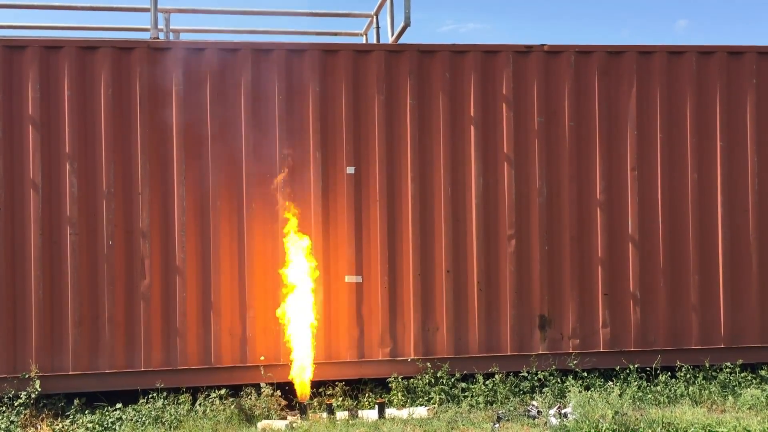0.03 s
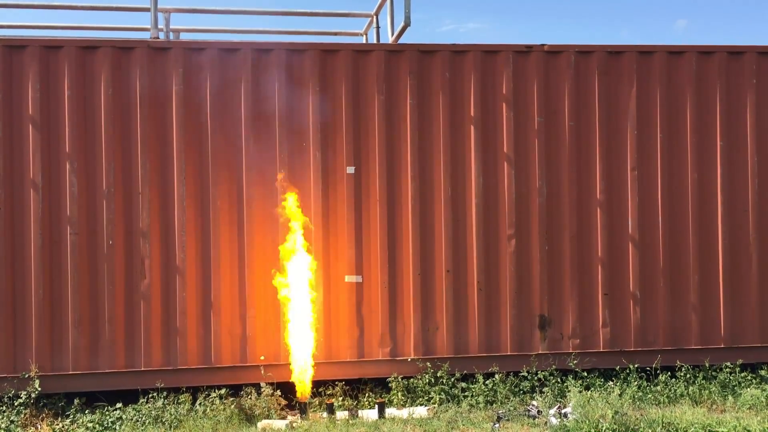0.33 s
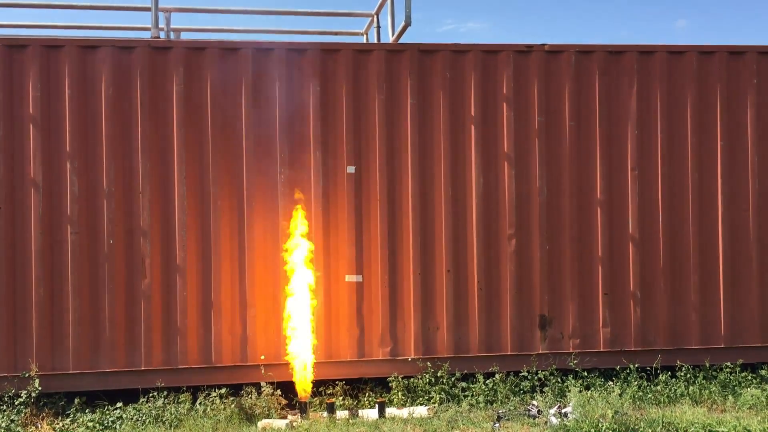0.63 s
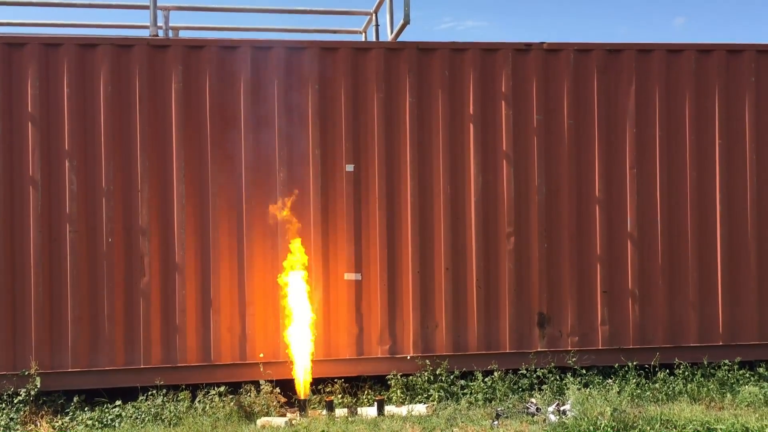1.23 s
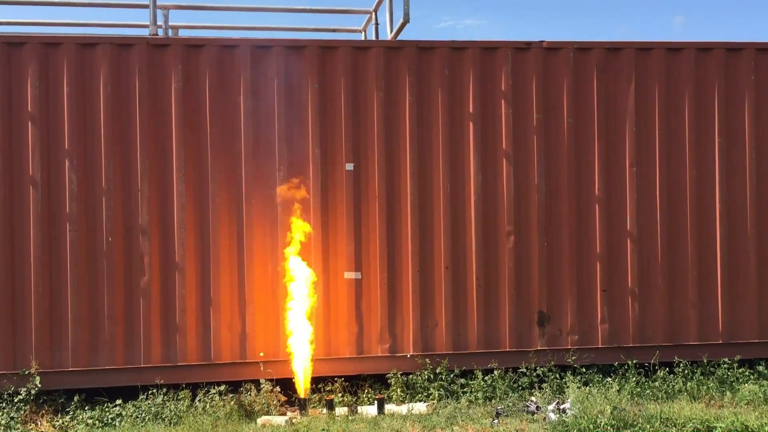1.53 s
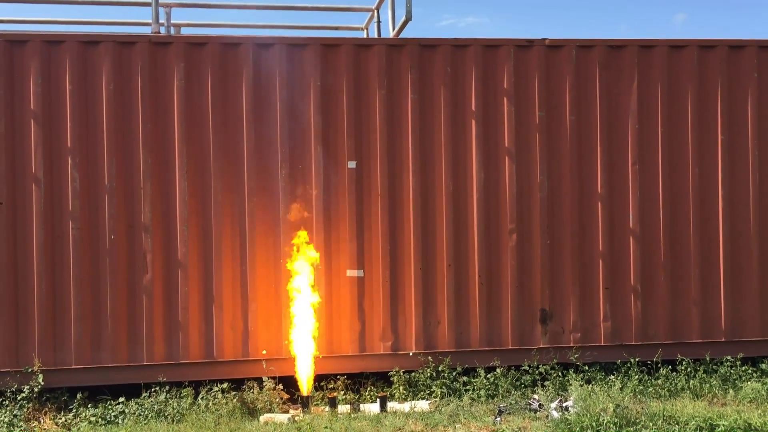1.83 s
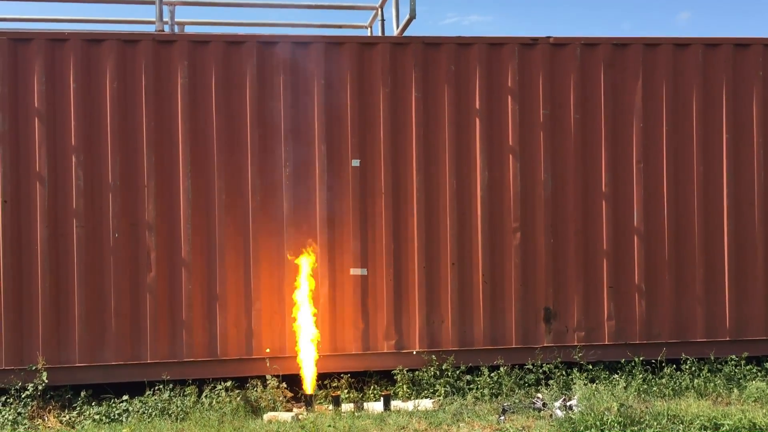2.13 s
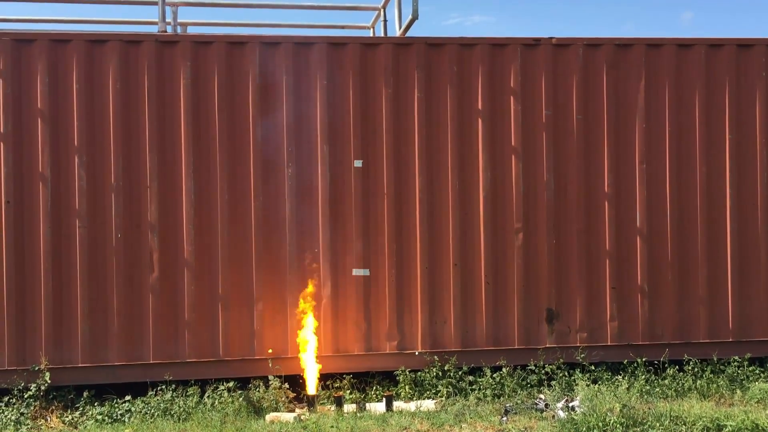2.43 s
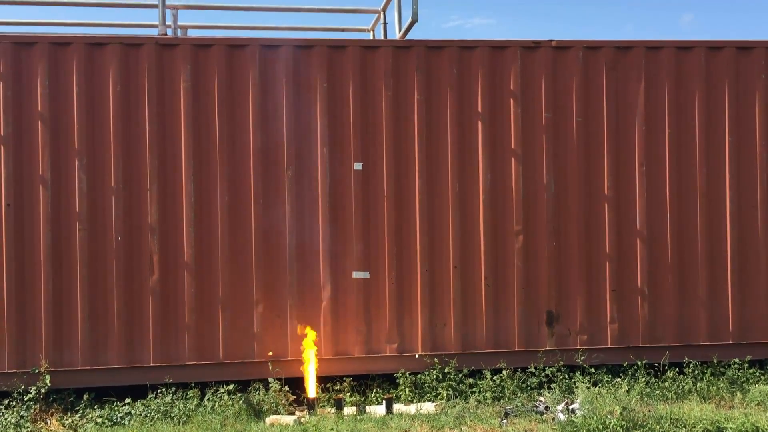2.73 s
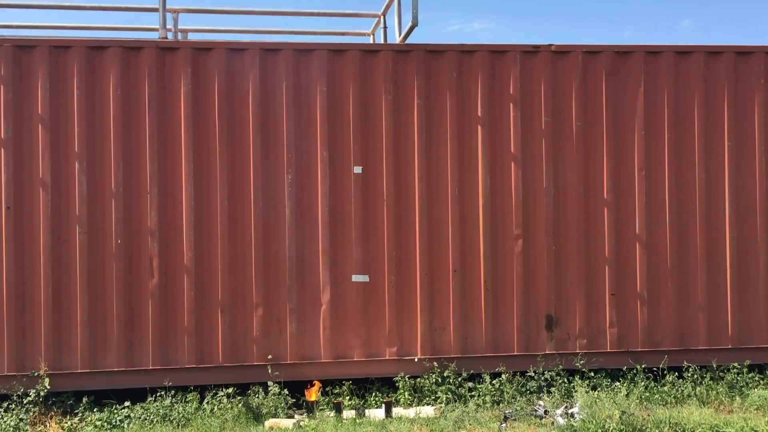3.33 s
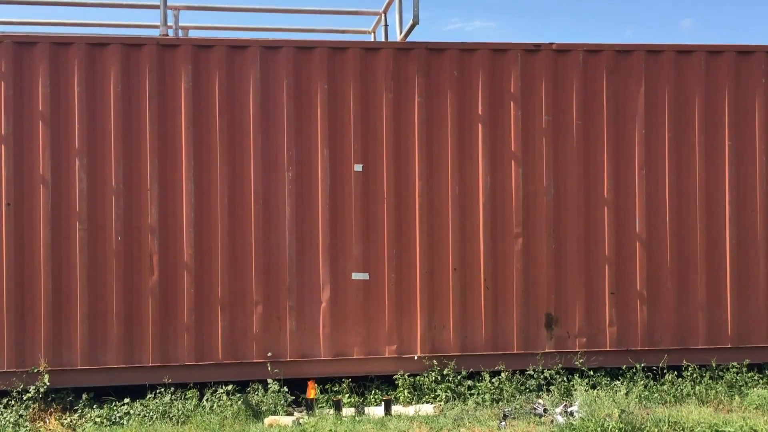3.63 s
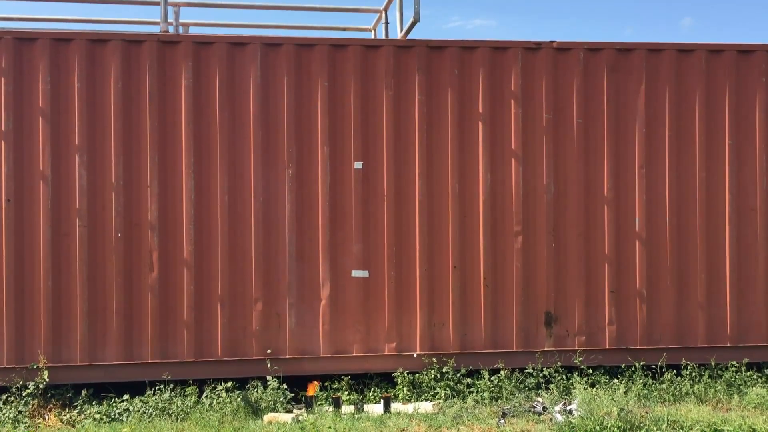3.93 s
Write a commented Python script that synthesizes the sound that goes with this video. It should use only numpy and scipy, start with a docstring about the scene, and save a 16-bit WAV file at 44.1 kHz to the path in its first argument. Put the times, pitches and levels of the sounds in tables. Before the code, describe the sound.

A tall gas flame roars and hisses outdoors, with a hollow ring from the burner, strongest around 1.5 seconds. From about 2 seconds the roar dies down with a brief ragged rumble, leaving a wavering hiss and airy whistle that weaken and falter toward 4 seconds. Wind rumbles and thumps on the microphone, easing after about 2.7 seconds. Faint machinery hums far away throughout.

```python
"""A gas flame dies down

A tall jet of flame burns outdoors in front of a steel wall, then sinks to a flicker.
The roar of its swirling fire dies first, leaving the wavering hiss, hollow ring and airy whistle
of gas in the burner. Wind hits the microphone in low thumps; faint machinery hums far away."""
import sys
import numpy as np
from scipy import signal
from scipy.fft import rfft, irfft
from scipy.io import wavfile
from scipy.ndimage import uniform_filter1d

SR = 44100
rng = np.random.default_rng(int(sys.argv[2]) if len(sys.argv) > 2 else 0)


def bounce(signal):
    """Save signal as a 16-bit WAV file at the path given by the first command-line argument."""
    frames = np.transpose(np.atleast_2d(signal))
    limited = np.clip(frames, -1, 1)
    pcm = np.round(limited * 32767).astype(np.int16)
    wavfile.write(sys.argv[1], SR, pcm)


N = 176400
T = np.arange(N) / SR
HZ = np.fft.rfftfreq(N, 1 / SR)
FRAMES = dict(nperseg=1024, noverlap=768)  # short overlapping slices of sound

# The gas flow. Each row: time in seconds, relative level of the hiss in dB, the same for its treble.
GAS_FLOW = [(0.0, -44, -48), (0.68, -42, -48.5), (0.77, -37.5, -46.5), (1.01, -43, -51.5), (1.12, -41, -48),
            (1.8, -43.5, -49.5), (1.97, -40, -47.5), (2.13, -47, -50), (2.42, -45.5, -49.5),
            (2.58, -54, -56.5), (2.68, -48, -50.5), (2.85, -55, -58), (2.93, -54, -52.5),
            (3.21, -56, -60.5), (3.27, -54, -55.5), (3.38, -54, -64), (3.46, -57, -57.5),
            (3.57, -51.5, -61.5), (3.68, -61, -77), (3.82, -68, -77), (3.88, -55, -64), (4.0, -67, -59.5)]
# The tones the gas stirs up. Each row: time in seconds, burner ring in dB, nozzle whistle in dB.
TONE_LEVELS = [(0, -44.5, -48), (1, -40, -59), (1.9, -37.5, -48), (2.3, -42, -43), (2.65, -48.5, -43.5),
               (3.05, -49.5, -45.3), (3.25, -54, -49), (3.56, -53, -50), (3.75, -57.5, -51.5),
               (4, -57, -51.5)]


def amp(db):
    """Turns decibels into a gain."""
    return 10 ** (np.asarray(db) / 20)


def unit(x):
    """Scales a signal to an average strength (rms) of 1."""
    return x / np.sqrt(np.mean(x ** 2) + 1e-20)


def curves(rows):
    """Joins the rows of a time table with straight lines: one curve for each value column."""
    seconds, *columns = np.transpose(rows)
    return [np.interp(T, seconds, column) for column in columns]


def colour(points):
    """Turns a few points of Hz and dB into a gain at every frequency."""
    hz, db = np.transpose(points)
    return amp(np.interp(np.log(HZ + 1), np.log(hz), db))


def peaks(hz, resonances):
    """Gain that lets through a narrow band around each ringing pitch."""
    return sum(amp(db) / (1 + (2 * (hz - centre) / width) ** 2) ** 2 for centre, width, db in resonances)


def lows(hz, edge_hz, steepness=4):
    """Gain that keeps what lies below the edge."""
    return 1 / (1 + (hz / edge_hz) ** steepness)


def treble_share(hz, from_hz=1800, to_hz=10700):
    """How much a frequency counts as treble, from 0 to 1."""
    return np.clip((hz - from_hz) / (to_hz - from_hz), 0, 1)


def shaped(x, gain):
    """Filters a signal with a gain for every frequency."""
    return irfft(rfft(x) * gain, N)


def noise(gain):
    """Filtered noise of strength 1."""
    return unit(shaped(rng.standard_normal(N), gain))


def wander(rate_hz):
    """A random wobble of strength 1, up to about the given rate."""
    return noise((HZ > 1) * lows(HZ, rate_hz))


def eddies(x, depth_db, bands=7, frames=12):
    """Swirling air lifts and drops small patches of time and pitch; the result has strength 1."""
    spectrum = signal.stft(x, **FRAMES)[2]
    patches = uniform_filter1d(rng.standard_normal(spectrum.shape), bands, axis=0)
    patches = unit(uniform_filter1d(patches, frames, axis=1))
    return unit(signal.istft(spectrum * amp(depth_db * patches), **FRAMES)[1][:N])


def flame_roar():
    """Swirling fire flutters, flares and fades with the size of the flame."""
    # The size of the flame. Each row: time in seconds, level of the roar in dB.
    flame_size = [(0.0, -35.5), (0.45, -32), (1.6, -29), (2.08, -32), (2.39, -42.5), (2.75, -47.5),
                  (3.2, -58), (4.0, -76)]
    # Sudden flares. Each row: middle in seconds, length in seconds, lift in dB.
    flares = [(0.583, 0.0028, 8), (1.284, 0.018, 4)]
    # The roar's tone. Each row: frequency in Hz, relative level in dB.
    roar_tone = [(100, -12.5), (250, -3.5), (390, -8.5), (510, 2), (700, -3), (850, -7), (1190, -13.5),
                 (1350, -7), (1510, -16), (1700, -11), (2200, -13), (3200, -16), (4500, -29), (9000, -40)]
    level_db, = curves(flame_size)
    flutter_db = 0.59 * wander(rate_hz=28)
    flare_db = sum(db * np.exp(-((T - middle) / length) ** 2) for middle, length, db in flares)
    return eddies(noise(colour(roar_tone)), depth_db=1.2) * amp(level_db + flutter_db + flare_db)


def gas_hiss():
    """Gas rushes from the nozzle; its body and its treble waver separately."""
    # The hiss's tone. Each row: frequency in Hz, relative level in dB.
    hiss_tone = [(1500, -15), (3300, 0.5), (4100, -1), (4800, -4.5), (5600, 0.6), (6800, -1.5),
                 (7600, -3.5), (9200, -4), (10000, -5), (10450, -10), (11200, -5), (13300, -6),
                 (15500, -8.5), (17200, -10)]
    body_db, treble_db = curves(GAS_FLOW)
    gas = eddies(noise(colour(hiss_tone)), depth_db=1.5, bands=4, frames=24)
    treble = shaped(gas, treble_share(HZ))
    hiss = (gas - treble) * amp(body_db) + treble * amp(treble_db + 4)
    return hiss * amp(1.5 + 0.36 * wander(rate_hz=37))


def burner_ring():
    """The flow makes the hollow body of the burner ring."""
    # The burner's ringing pitches. Each row: pitch in Hz, width in Hz, relative level in dB.
    resonances = [(938.4, 67, 1), (1070, 166, 0), (2137, 120, -7.5)]
    ring_db, _ = curves(TONE_LEVELS)
    return eddies(noise(peaks(HZ, resonances)), depth_db=-0.5) * amp(ring_db)


def nozzle_whistle(falter_db=-60):
    """An airy whistle stands out as the jet weakens, then sinks, thins and dulls as gas runs out."""
    # The nozzle's ringing pitches. Each row: pitch in Hz, width in Hz, relative level in dB.
    resonances = [(1086, 150, 5.5), (1308, 240, 1), (1632, 264, 3), (2052, 300, 0), (2570, 450, -4),
                  (3050, 240, 1.5), (3510, 420, 1), (3930, 420, 0.5), (4530, 620, -5), (8230, 1200, -10.5),
                  (9100, 1750, -7.5), (13700, 2100, -18)]
    # The whistle's sag. Each row: time in seconds, share of full pitch, lift of the low tones in dB.
    sag = [(2.3, 0.96, 4.5), (3.0, 1, 4), (3.35, 0.95, -11), (4, 0.95, -2)]
    hz, seconds, spectrum = signal.stft(rng.standard_normal(N), SR, **FRAMES)
    hz = hz[:, None]
    pitch, low_db, _, treble_db = (np.interp(seconds, T, c) for c in curves(sag) + curves(GAS_FLOW))
    dull_db = np.minimum(treble_db - falter_db, 0) * treble_share(hz)  # only when the flow falters
    lift_db = low_db * lows(hz, edge_hz=1540, steepness=10)
    spectrum = spectrum * peaks(hz / pitch, resonances) * amp(dull_db + lift_db)
    whistle = signal.istft(spectrum, **FRAMES)[1][:N]
    _, whistle_db = curves(TONE_LEVELS)
    return eddies(whistle, depth_db=2.5, bands=4, frames=24) * amp(whistle_db)


def wind():
    """Wind on the microphone: a lumpy rumble whose upper part comes in gusts, with thumps on top."""
    # The rumble's tone. Each row: frequency in Hz, relative level in dB.
    rumble_tone = [(15, -47), (30, -23), (50, -1.5), (85, 2), (160, -2), (210, -3.5), (290, -21),
                   (500, -22), (820, -49), (2500, -70)]
    # The wind's strength. Each row: time in seconds, level of the rumble in dB.
    strength = [(0, -25), (.8, -29.5), (1.55, -28.5), (1.83, -29.5), (2.3, -23.5), (2.7, -26),
                (2.77, -44.5), (3.03, -36), (3.15, -49), (3.55, -44), (3.9, -54.5), (4, -36)]
    # Thumps. Each row: middle in seconds, length in seconds, relative level in dB, upper edge in Hz.
    thumps = [(0.522, 0.032, -17, 180), (0.777, 0.011, -14, 166), (0.847, .01, -12.5, 187),
              (1.334, 0.03, -20, 224), (1.703, 0.016, -14, 495), (1.721, 0.034, -15.5, 224),
              (1.766, 0.014, -19, 219), (1.872, 0.0059, -15, 180.6), (1.928, 0.013, -17, 224),
              (1.948, 0.065, -21, 176), (2.018, 0.029, -18, 305), (2.051, 0.022, -18.5, 277.8),
              (2.165, 0.019, -16.5, 334), (2.192, 0.029, -15, 225), (2.227, 0.024, -11.5, 278),
              (2.426, 0.027, -12.5, 235), (2.457, .009, -13, 320), (2.578, 0.022, -17, 217),
              (2.648, 0.023, -22.5, 219), (2.699, 0.01, -21, 385), (2.715, 0.018, -22, 161),
              (2.82, 0.059, -26, 165), (2.998, 0.032, -24.5, 133), (3.279, 0.017, -31.5, 119),
              (3.61, 0.012, -20.5, 137), (3.984, 0.023, -25, 160)]
    air = noise(colour(rumble_tone))
    bass = shaped(air, lows(HZ, edge_hz=78))
    gusts = wander(rate_hz=32)
    rumble = unit(bass * amp(0.48 * gusts) + (air - bass) * amp(4.0 * gusts))
    pressure = rumble * amp(curves(strength)[0]) + sum(wind_thump(*row) for row in thumps)
    return shaped(pressure, 1 - lows(HZ, edge_hz=35))  # the microphone misses the deepest bass


def far_machinery(drift_share=0.0188):
    """Distant machines give a dull wash of noise and two hums of unsteady pitch."""
    # The hums. Each row: pitch in Hz, level in dB.
    hums = [(98, -53), (928, -75)]
    # The wash's tone. Each row: frequency in Hz, relative level in dB.
    wash_tone = [(25, -5), (48, 16), (110, 4), (200, -6.5), (320, -8.5), (620, -7), (950, -8), (1350, -22),
                 (2200, -12), (3400, -12), (5000, -29), (16000, -45)]
    hum = 0
    for hz, db in hums:
        pitch_hz = hz * (1 + drift_share * wander(rate_hz=6.3))
        hum += amp(db) * np.sqrt(2) * np.sin(2 * np.pi * np.cumsum(pitch_hz) / SR)
    return hum + amp(-46) * eddies(noise(colour(wash_tone)), depth_db=1.5)


def wind_thump(middle_s, length_s, db, edge_hz, air_low_hz=67.5, knock_low_hz=77):
    """One swirl of air hits the microphone: a dull knock inside a short puff of noise."""
    dull = lows(HZ, edge_hz, steepness=3.94)
    air = noise(dull * HZ ** 2 / (HZ ** 2 + air_low_hz ** 2))
    puff = air * np.exp(-2 * ((T - middle_s) / length_s) ** 2)
    ratio = 1j * HZ / knock_low_hz
    bass_cut = ratio ** 2 / (ratio ** 2 + ratio + 1)
    knock = irfft(dull * bass_cut * np.exp(-2j * np.pi * HZ * middle_s), N)  # a muffled click mid-puff
    thump = unit(puff) + 0.81 * unit(knock)
    return amp(db - 2.5) * thump * np.sqrt(length_s * SR / np.sum(thump ** 2))


def flame_tearing(middle_s=2.307, length_s=0.16, centre_hz=347, width_hz=600):
    """The collapsing flame tears with a brief swell of ragged, low rumble."""
    swell = np.exp(-((T - middle_s) / length_s) ** 2)
    rumble = noise(peaks(HZ, [(centre_hz, width_hz, 0)]))
    return rumble * swell * amp(-33.5 + 1.5 * wander(rate_hz=40))


def scene():
    """The jet with its echoes, the wind and the far machinery, in one channel."""
    # Echoes off the ground and the wall. Each row: delay in seconds, gain.
    bounces = [(.003, 0.11), (.0055, 0.11), (0.014, 0.13)]
    jet = flame_roar() + flame_tearing() + gas_hiss() + burner_ring() + nozzle_whistle()
    echoes = sum(gain * np.interp(T - delay, T, jet, left=0) for delay, gain in bounces)
    return (jet + echoes + wind() + far_machinery())[None]


def record(dry, edge_hz=17200):
    """Cuts away the very highest treble."""
    treble_cut = signal.firwin(611, edge_hz, window=("kaiser", 9), fs=SR)
    return signal.oaconvolve(dry, treble_cut[None], "same")


dry = scene()
out = record(dry)
bounce(out)
```